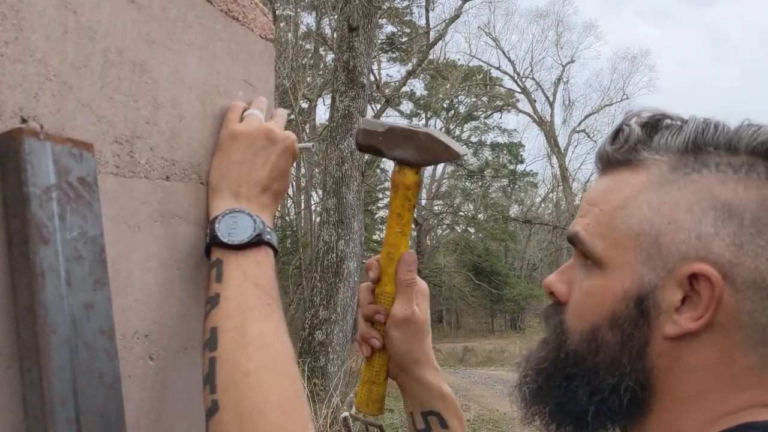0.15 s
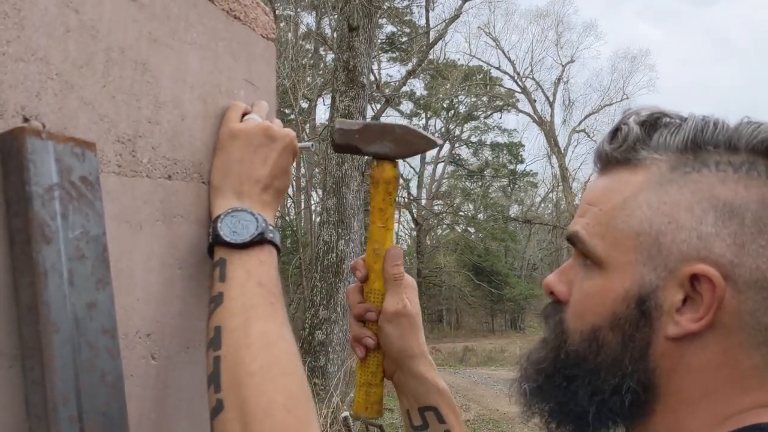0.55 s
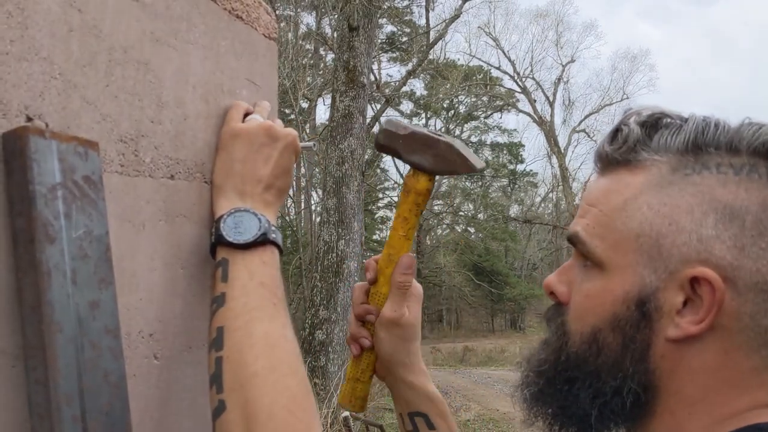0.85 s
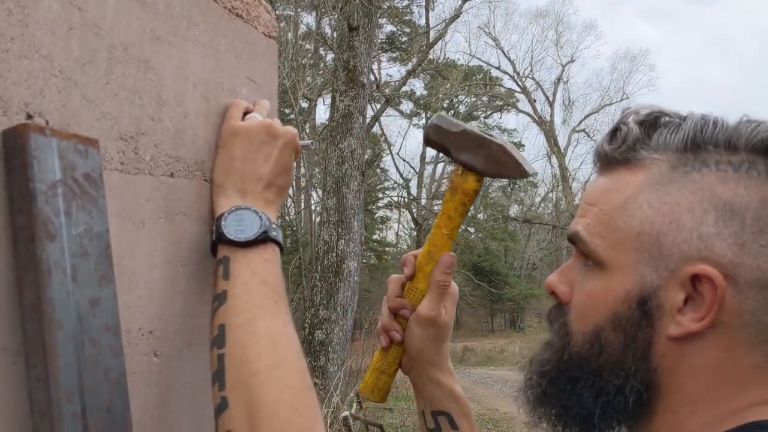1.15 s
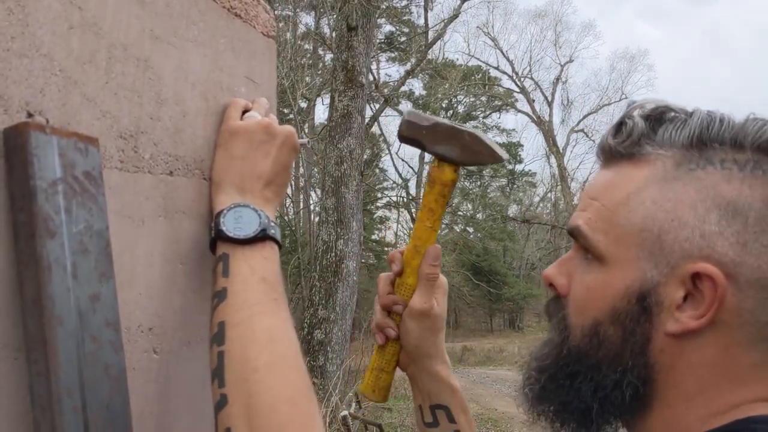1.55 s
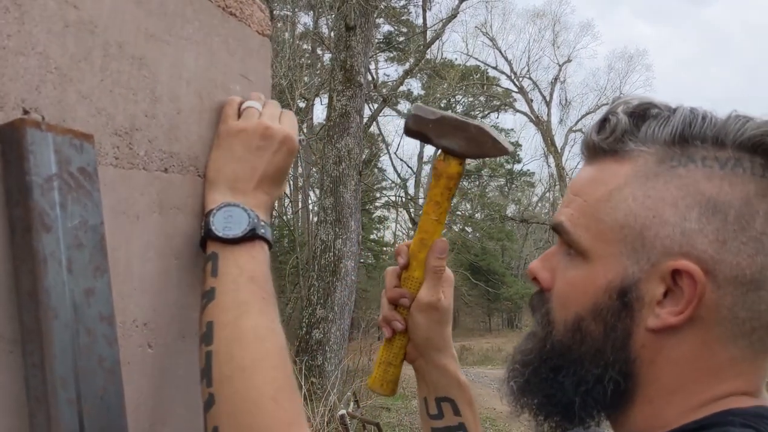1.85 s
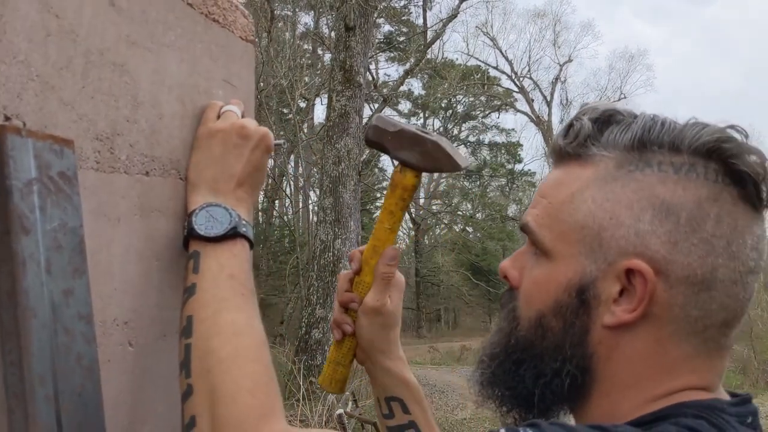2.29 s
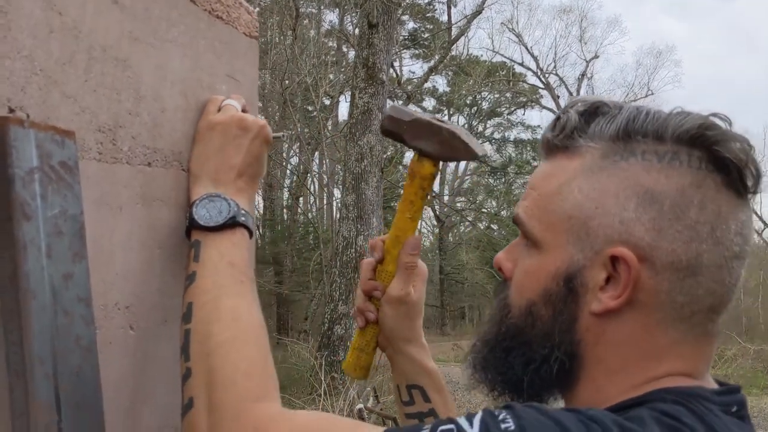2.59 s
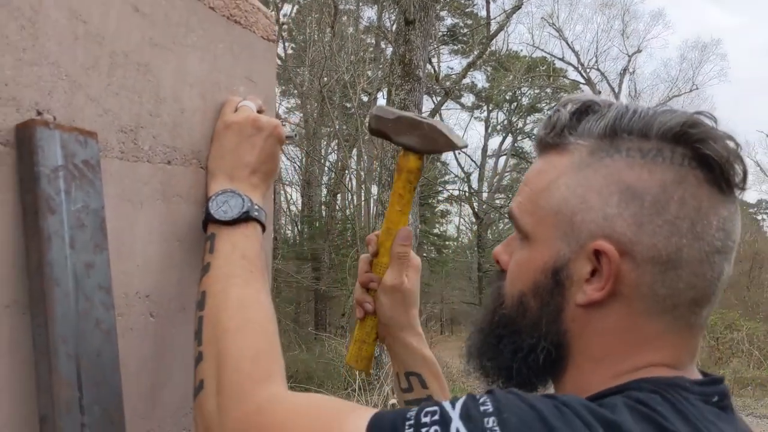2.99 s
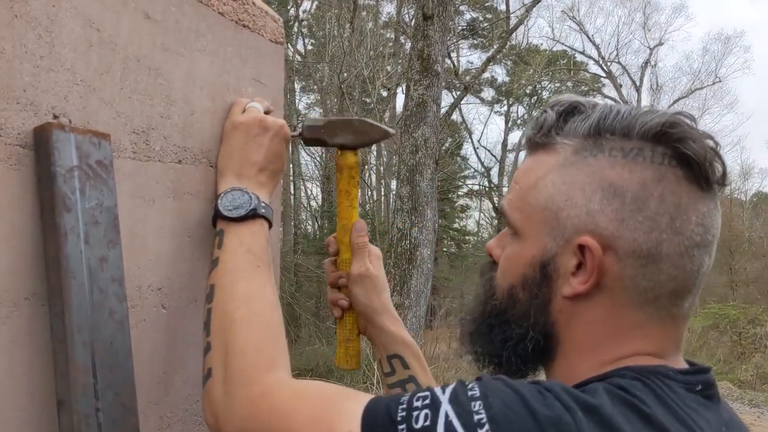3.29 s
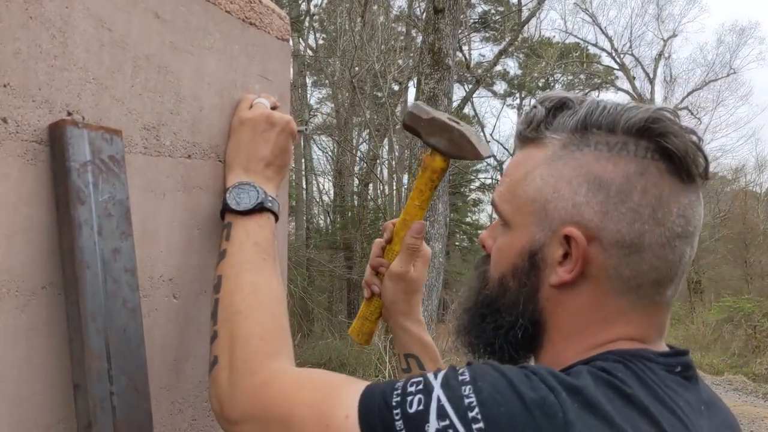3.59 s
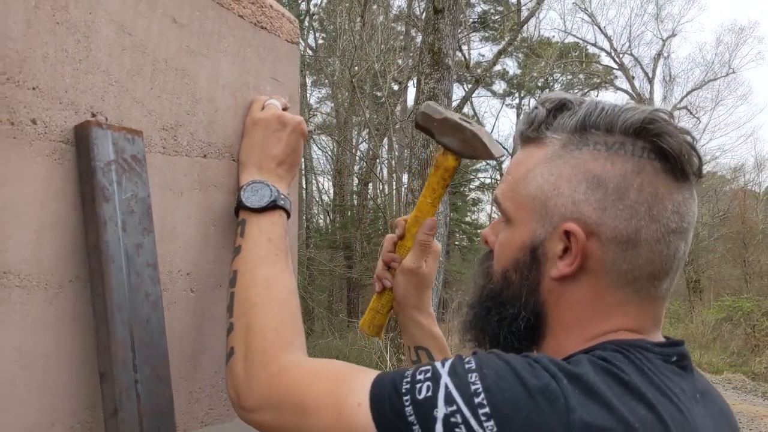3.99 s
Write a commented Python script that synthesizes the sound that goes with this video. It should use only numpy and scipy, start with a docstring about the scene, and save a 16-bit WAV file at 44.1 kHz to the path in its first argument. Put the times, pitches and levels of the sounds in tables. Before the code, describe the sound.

Over quiet outdoor rumble, steel strikes steel about twice a second, dry and piercing, with a damped earthy thud and a soft wash back from the trees. After four hits, skin rubs grit faintly and the loose sleeve ticks twice. Four more hits follow, knocking louder as the anchor seats, while distant birds whistle and chirp. Stereo, close microphone, peaks flattened by overload.

```python
"""Outdoors, over a low rumble of noise, a hammer drives a steel anchor and sleeve into an earth wall: four blows.
Each is a burst of noise (the crack), a sinking low note (the thud), ringing sines, echoes and a wash from trees.
In the pause, fingers brush the wall in swells of noise and the sleeve clinks twice, in short sines and noise.
Far birds, made of gliding sines over a blur of noise, grow clearer and four more blows follow; one bird repeats a
phrase through the last three while others call, and the fingers brush once more. The cracks overload the input."""
import sys
import numpy as np
from scipy import signal
from scipy.fft import rfft, irfft, next_fast_len
from scipy.io import wavfile
from scipy.ndimage import uniform_filter1d

SR = 44100
rng = np.random.default_rng(int(sys.argv[2]) if len(sys.argv) > 2 else 0)


def dump_mix(stems):
    """Bounce the given channels to the path in sys.argv[1] as a 16-bit WAV at rate SR."""
    frames = np.atleast_2d(stems).T  # one column per channel
    limited = np.clip(frames, -1, 1)  # hard clip at full scale
    pcm = np.round(limited * 32767).astype(np.int16)
    wavfile.write(sys.argv[1], SR, pcm)


N = 182733
TIME = np.arange(N) / SR  # seconds

# All dB are relative levels; a "fall time" is the time to fade by 60 dB.
# colour of the outdoor rumble: (frequency [Hz], level per Hz [dB])
AIR_COLOUR = [(18, -73.5), (30, -38), (66, -12.5), (153, -3), (245, -14), (273, -10), (303, -17),
              (801, -23), (1010, -26.5), (1350, -23), (1910, -29), (2350, -30), (2830, -36), (12000, -44.5),
              (16000, -56)]
# loudness of the blur of many far birds: (time [s], level [dB])
CHORUS_LEVEL = [(0, -98), (2.6, -87), (3.0, -65), (3.25, -71.5), (3.5, -63.5), (4.14, -66)]
# colour of that blur: (frequency [Hz], level per Hz [dB])
CHORUS_COLOUR = [(1200, -22.5), (2200, 1), (2800, 4.5), (4200, -10), (6500, -22), (12000, -34)]
# hammer blows: (time [s], thud [dB], steel ring [dB], wash from the trees [dB], strongest clang [Hz])
BLOWS = [(0.1103, -20, -5.5, -8.5, 7600), (0.5647, -5.5, -7.5, -6, 11240), (1.0069, -3.5, 2, -3, 12530),
         (1.444, -5, 3.5, -2, 12270), (2.4589, -8.5, 1, -4, 6220), (2.9223, -8.5, -5.5, 6, 8500),
         (3.3728, -1, -1.5, 4.5, 3120), (3.828, 0.3, -5.5, 1.5, 6300)]
# colour of the steel crack: (frequency [Hz], level per Hz [dB])
CRACK_COLOUR = [(100, -41.5), (400, -16), (1300, -4), (1700, -3.5), (2200, -4.5), (3000, 5.5), (4200, 2.5),
                (5900, 0), (6900, -2), (8600, 2), (9700, 3), (12500, 3.5), (14300, -4), (15600, 3)]
# the wall around the hole: (frequency [Hz], level [dB], fall time [s])
WALL_TONES = [(563, -31.5, 0.027), (680.3, -24.5, 0.025)]
# the anchor knocking in its hole: (frequency [Hz], level [dB], fall time [s])
KNOCK_TONES = [(945, -26, 0.017), (1156, -21.5, 0.018), (1345, -21.5, 0.011), (1530, -50.5, 0.12)]
# the hammer head and handle shuddering: (frequency [Hz], level [dB], fall time [s])
SHUDDER_TONES = [(198, -31.5, .099), (302.6, -30, .092), (434, -36, 0.054)]
# short overtones of the steel: (frequency [Hz], level [dB], fall time [s])
STEEL_OVERTONES = [(2740, -42, 0.055), (3220, -39.5, .06), (3800, -39.5, 0.039), (6100, -34.5, 0.055),
                   (6400, -36, .06), (8200, -41.5, 0.085), (11900, -32, 0.066), (13000, -30, 0.055),
                   (14800, -44.5, .06), (15570, -40, .06)]
# reflections from the ground and a far wall: (delay [s], level [dB])
ECHOES = [(.0080, -23), (.0390, -30), (0.0433, -33.5)]
# colour of the crack scattered nearby: (frequency [Hz], level per Hz [dB])
SCATTER_COLOUR = [(80, -30.5), (300, 0.5), (1400, -2), (2100, -6), (3200, -2), (4700, -0.5), (6300, 0),
                  (7600, -5), (11700, -1.5), (15000, -6)]
# colour of the wash from the trees: (frequency [Hz], level per Hz [dB])
WASH_COLOUR = [(300, -11.5), (1200, -12), (3000, 0.5), (7000, 0), (11000, 1.5), (16000, -9.5)]
# the two microphone ports colour close sound differently: (frequency [Hz], left minus right [dB])
PORT_BALANCE = [(400, 0), (1200, -1.5), (2400, 0), (3500, 7), (4700, 3.5), (6400, -7), (8500, 3),
                (10700, -7), (12100, 2), (13500, -4), (15300, 3)]
# fingers brushing the wall: (time [s], length [s], level [dB])
RUBS = [(1.869, .15, -67.5), (2.063, .13, -74), (2.244, .09, -66), (4.015, .1, -58.5)]
# colour of the brushing: (frequency [Hz], level per Hz [dB])
RUB_COLOUR = [(2000, 0), (7000, -6), (11500, 2), (16000, -10)]
# light touches of steel on the sleeve: (time [s], level [dB], frequency [Hz], fall time [s])
CLINKS = [(2.0018, -45.5, 7930, 0.074), (2.0477, -44, 5170, 0.011)]
# sleeve overtones that every touch wakes: (frequency [Hz], level [dB], fall time [s])
SLEEVE_OVERTONES = [(6480, -18, 0.076), (8150, 2, 0.02), (10600, -17, .035), (11700, -20, .035)]
# other birds with single slurs, before and during the song:
# (time [s], length [s], start [Hz], end [Hz], level [dB])
SLURS = [(2.37, 0.1, 1770, 1830, -71), (2.684, 0.049, 2500, 1755, -72.5), (3.262, 0.14, 6400, 4800, -79),
         (3.55, 0.043, 1693, 1990, -59), (3.663, 0.18, 2817, 2214, -57), (3.748, .034, 3390, 4530, -64),
         (3.888, 0.084, 2930, 2975, -62)]
# notes of the repeated song: (time into the phrase [s], length [s], start [Hz], end [Hz], level [dB])
PHRASE = [(-.004, .05, 1930, 2124, -61.5), (0.049, .09, 2054, 2100, -69), (0.118, .08, 2626, 3056, -56)]

AIR_DB = -63.5
PORT_LAG_S = .00016
# each blow drives the anchor a share of the way left; seated deeper, it knocks and barks louder
SINK_PER_BLOW = .24
# level at the first blow, and the rise for an anchor driven all the way in
KNOCK_DB, KNOCK_SEATED_DB = -3.5, 11
BARK_HZ, BARK_DB, BARK_SEATED_DB = 3000, -4, 7
# where the hammer face lands favours one broad resonance of anchor and sleeve
CLANG_DB, CLANG_WIDTH_HZ = 6, 900
THUD_DB, RING_DB = -18, -2.5
SHUDDER_FOLLOWS_THUD = 0.44  # dB per dB of thud
SCATTER_FOLLOWS_RING = .25  # dB per dB of ring: a blow that rings well leaves more clatter
STEEL_HZ = 11962
# stray chirps at random over the chorus
CHIRPS_PER_S, CHIRP_S, CHIRP_HZ, CHIRP_OVER_CHORUS_DB = 7.5, .05, 2800, -2.5
CHIRP_SPREAD_OCT, CHIRP_GLIDE_OCT = 0.19, 0.11
# one bird repeats its phrase at an even pace, starting softly
SONG_START_S, SONG_PERIOD_S, SONG_SOFT_START_DB = 2.808, .371, -4.5
BIRD_WAVER = .018  # share of the pitch, rms
WOOD_T60_S, WOOD_DB = .4, 3.5
CUTOFF_HZ = 17150


def from_db(db):
    """Turn decibels into a plain multiplier."""
    return 10 ** (np.asarray(db) / 20)


def rms_one(x):
    """Scale a signal to an average strength (rms) of 1."""
    return x / np.sqrt(np.mean(x ** 2) + 1e-20)


def at_hz(points, hz):
    """Read a curve of (Hz, dB) points at any frequency, on a logarithmic pitch scale."""
    points = np.array(points)
    return np.interp(np.log(hz), np.log(points[:, 0]), points[:, 1])


def add(track, s, sound):
    """Lay a sound into a track at time s, cutting off what runs past the end."""
    start = round(s * SR)
    track[:, start:start + sound.shape[-1]] += sound[..., :N - start]


def filtered(x, order, hz, kind="low"):
    """Pass a sound through a smooth low-cut ("high") or high-cut ("low") filter."""
    return signal.sosfilt(signal.butter(order, hz, kind, fs=SR, output="sos"), x)


def delayed(x, s):
    """Shift a sound later, even by a fraction of a sample."""
    index = np.arange(len(x))
    return np.interp(index - s * SR, index, x, left=0)


def two_ports(x, lag_s, pan_db):
    """Sound from the left reaches the right port a little later; pan_db is left minus right."""
    left = x * from_db(pan_db / 2)
    right = delayed(x, lag_s) * from_db(-pan_db / 2)
    return np.array([left, right])


def noise(colour, size):
    """Two unrelated channels of coloured noise; rms 1."""
    hz = np.fft.rfftfreq(size, 1 / SR) + 1
    spectrum = rfft(rng.standard_normal((2, size)))
    return rms_one(irfft(spectrum * from_db(at_hz(colour, hz)), size))


def ring(modes, t, alternate=False):
    """Struck things sound as fading sines; every strike shares its force out a little differently."""
    sign = -1 if alternate else 1  # alternate: every second sine starts downward
    total = np.zeros(len(t))
    for k, (hz, db, t60) in enumerate(modes):
        fading = from_db(db + rng.standard_normal() - 60 * t / t60)
        total += sign ** k * fading * np.sin(2 * np.pi * hz * t)
    return total


def grainy(size, depth_db):
    """Separate reflections make a tail uneven from one millisecond to the next; rms 1."""
    bumps = rms_one(uniform_filter1d(rng.standard_normal(size), size=60))
    return rms_one(from_db(depth_db * bumps))


def air():
    """Outdoor rumble that swells a little, more alike at both ports in the bass."""
    mid, side = filtered(noise(AIR_COLOUR, N), 4, 13000)
    side = side - 0.37 * filtered(side, 1, 900)
    drift = uniform_filter1d(rng.standard_normal(N), size=5000)
    swell = rms_one(uniform_filter1d(drift, size=3000, mode="wrap"))
    return from_db(AIR_DB + 0.38 * swell) * np.array([mid + side, mid - side])


def chorus():
    """Many far birds blur into coloured noise whose level follows a curve."""
    level_db = np.interp(TIME, *np.transpose(CHORUS_LEVEL))
    return from_db(level_db) * noise(CHORUS_COLOUR, N)


def hammer():
    """Each blow sends crack, knock, thud, shudder and ring directly, then echoes, scatter and wash."""
    direct, around, t = np.zeros((2, N)), np.zeros((2, N)), TIME[:SR // 2]
    for k, (s, thud_db, ring_db, wash_db, clang_hz) in enumerate(BLOWS):
        seated = 1 - (1 - SINK_PER_BLOW) ** k  # 0 at the first blow, 1 when fully in
        colour = clang_colour(clang_hz, seated)
        hit = two_ports(knock(t, seated), lag_s=0.000084, pan_db=0)
        add(hit, 0, strike(colour, near_db=9.3, apart_db=2.5))
        add(direct, s, hit)
        add(direct, s, from_db(THUD_DB + thud_db) * two_ports(thud(t), lag_s=0.00025, pan_db=5.5))
        shudder = two_ports(ring(SHUDDER_TONES, t, alternate=True), lag_s=0.00022, pan_db=4)
        add(direct, s, from_db(SHUDDER_FOLLOWS_THUD * thud_db) * shudder)
        # the head's main tone outlasts all the others
        steel = ring([(STEEL_HZ, -30, .19)] + list(STEEL_OVERTONES), t)
        add(direct, s, from_db(RING_DB + ring_db) * two_ports(steel, PORT_LAG_S, pan_db=-4.5))
        for delay_s, echo_db in ECHOES:
            add(around, s + delay_s, from_db(echo_db) * hit)
        add(around, s, from_db(SCATTER_FOLLOWS_RING * ring_db) * scatter(t, colour))
        add(around, s, from_db(wash_db) * wash(t))
    return port_colour(direct) + around


def clang_colour(clang_hz, seated):
    """A spectrum with broad bumps at the favoured resonance and at the sleeve's bark: (Hz, dB)."""
    hz = np.geomspace(80, 17000, num=120)
    clang = np.exp(-((hz - clang_hz) / CLANG_WIDTH_HZ) ** 2)
    bark = np.exp(-((hz - BARK_HZ) / CLANG_WIDTH_HZ) ** 2)
    bark_db = BARK_DB + BARK_SEATED_DB * seated
    return np.column_stack([hz, CLANG_DB * clang + bark_db * bark])


def knock(t, seated):
    """The wall around the hole rings briefly, and the anchor in it louder as it sits deeper."""
    wall = ring(WALL_TONES, t, alternate=True)
    anchor = ring(KNOCK_TONES, t, alternate=True)
    return wall + from_db(KNOCK_DB + KNOCK_SEATED_DB * seated) * anchor


def crack(colour, contact_s, t60, size=512):
    """Steel chatters on steel for about a millisecond: a burst with an even, coloured spectrum."""
    t, hz = TIME[:size], np.fft.rfftfreq(size, 1 / SR) + 1
    shape = from_db(-60 * np.maximum(t - contact_s, 0) / t60)
    gain = from_db(at_hz(CRACK_COLOUR, hz) + at_hz(colour, hz))
    spectrum = rfft(rng.standard_normal(size) * shape)
    # dividing by the local strength evens out chance peaks and gaps
    local = np.sqrt(uniform_filter1d(np.abs(spectrum) ** 2, size=25))
    fade_out = np.minimum(1, (t[-1] - t) / t[size // 2]) ** 2
    return irfft(spectrum / local * gain, size) * fade_out


def strike(colour, near_db, apart_db):
    """The crack as both ports hear it: partly alike, partly by paths of their own."""
    near = two_ports(crack(colour, contact_s=.0006, t60=.0032), PORT_LAG_S, pan_db=0)
    apart = np.array([crack(colour, contact_s=.0008, t60=.008) for side in range(2)])
    return from_db(near_db) * near + from_db(apart_db) * apart


def thud(t, start_hz=216, end_hz=134, slacken_s=.012):
    """The wall's low note sinks as the pressure of the blow lets go, sways back once and is soon damped."""
    hz = end_hz + (start_hz - end_hz) * np.exp(-(t / slacken_s) ** 4)
    push = (1 - np.exp(-(t / 0.00675) ** 2)) * from_db(-60 * t / .11)
    sway = from_db(-18.5) * np.exp(-((t - .032) / 0.0043) ** 2)
    wave = -(push + sway) * np.cos(2 * np.pi * np.cumsum(hz) / SR)
    return filtered(wave, 1, 95, "high")


def scatter(t, colour):
    """Wall, frame and body scatter the crack: a quick fall, then a slower one."""
    rise = 1 - np.exp(-t / .0012)
    fall = from_db(-21 - 60 * t / 0.043) + from_db(-35.5 - 60 * t / .16)
    # the tail keeps part of the blow's own colour
    tint = [(hz, at_hz(SCATTER_COLOUR, hz) + .4 * db) for hz, db in colour]
    shared = two_ports(noise(tint, len(t))[0], lag_s=.0001, pan_db=4.5)
    separate = noise(tint, len(t))
    return rise * fall * grainy(len(t), depth_db=1.7) * 0.76 * (shared + separate)


def wash(t, trees_s=0.13):
    """Trunks and leaves send back a soft tail, with a swell when the edge of the wood answers."""
    tail = from_db(-48.5 - 60 * t / 0.42) * (1 - np.exp(-(t / 0.015) ** 2))
    edge = from_db(-68.5) * np.exp(-((t - trees_s) / 0.037) ** 2)
    return np.hypot(tail, edge) * grainy(len(t), depth_db=1.5) * noise(WASH_COLOUR, len(t))


def port_colour(x):
    """Each port lifts the bands that the other one loses."""
    size = next_fast_len(N)
    balance_db = at_hz(PORT_BALANCE, np.fft.rfftfreq(size, 1 / SR) + 1)
    gain = from_db(np.array([balance_db, -balance_db]) / 2)
    gain = gain / np.sqrt(np.mean(gain ** 2, axis=0))  # keep the two ports' average power
    return irfft(rfft(x, size) * gain, size)[:, :N]


def rubs():
    """Skin on grit makes soft, bright swells of noise."""
    out = np.zeros((2, N))
    for s, length_s, db in RUBS:
        size = round(length_s * SR)
        swell = np.sin(np.linspace(0, np.pi, size)) ** 2
        add(out, s, from_db(db) * swell * noise(RUB_COLOUR, size))
    return out


def clinks():
    """The loose sleeve ticks twice in the pause: fading tones with a little noise."""
    out, t = np.zeros((2, N)), TIME[:SR // 5]
    for s, db, hz, t60 in CLINKS:
        tone = ring([(hz, 0, t60)] + list(SLEEVE_OVERTONES), t)
        fall = from_db(-9.5 - 60 * t / 0.016) + from_db(-19 - 60 * t / 0.23)
        tick = fall * noise([(2000, -3), (5000, -4), (11000, 2.5), (16000, -21.5)], len(t))
        add(out, s, from_db(db) * (two_ports(tone, PORT_LAG_S, pan_db=-4) + tick))
    return out


def birds():
    """Far whistles, smeared by the wood: each is mixed with a fading tail of random echoes."""
    dry_notes, t = np.zeros((2, N)), TIME[:SR // 2]
    for s, *note in chirps() + list(SLURS) + song():
        add(dry_notes, s, whistle(*note))
    wood = rng.standard_normal((2, len(t))) * from_db(-60 * t / WOOD_T60_S)
    wood = wood / np.sqrt(np.sum(wood[0] ** 2))
    smeared = signal.fftconvolve(dry_notes, wood, axes=1)[:, :N]
    return dry_notes + from_db(WOOD_DB) * smeared


def whistle(length_s, start_hz, end_hz, db):
    """One gliding, wavering note that swells and fades."""
    u = np.linspace(0, 1, round(length_s * SR))  # 0 to 1 along the note
    wander = rms_one(uniform_filter1d(rng.standard_normal(SR // 2), size=200))[:len(u)]
    hz = (start_hz + (end_hz - start_hz) * u) * (1 + BIRD_WAVER * wander)
    phase = 2 * np.pi * np.cumsum(hz) / SR
    return from_db(db) * np.sin(np.pi * u) * np.sin(phase)


def chirps(count=16):
    """Short notes at loose intervals and chance pitches, following the chorus level: rows like SLURS."""
    before_end_s = (np.arange(count) + rng.uniform(0.55, 1, count)) / CHIRPS_PER_S
    s = TIME[-1] - before_end_s
    pitch, glide = rng.standard_normal((count, 2)).T
    start_hz = CHIRP_HZ * 2 ** (CHIRP_SPREAD_OCT * pitch)
    end_hz = start_hz * 2 ** (CHIRP_GLIDE_OCT * glide)
    db = np.interp(s, *np.transpose(CHORUS_LEVEL)) + CHIRP_OVER_CHORUS_DB
    rows = zip(s, np.full(count, CHIRP_S), start_hz, end_hz, db)
    return [row for row in rows if row[0] > 0]


def song(count=4):
    """One bird repeats its phrase, the first time softly: rows like SLURS."""
    rows = []
    for k in range(count):
        phrase_s = SONG_START_S + k * SONG_PERIOD_S
        phrase_db = SONG_SOFT_START_DB if k == 0 else 0
        for offset_s, length_s, start_hz, end_hz, db in PHRASE:
            rows.append((phrase_s + offset_s, length_s, start_hz, end_hz, db + phrase_db))
    return rows


def scene():
    """All sounds together, with the hammer's deepest bass cut."""
    close = filtered(hammer(), 2, 58, "high")
    return air() + chorus() + close + rubs() + clinks() + birds()


def record(dry):
    """The cracks overload the input, which flattens their peaks; the deepest bass and the top are cut."""
    top = .76  # the largest level the input can reach
    clipped = dry / (1 + (dry / top) ** 4) ** .25
    clipped = filtered(clipped, 2, 32, "high")
    return signal.sosfilt(signal.cheby2(14, 70, CUTOFF_HZ, fs=SR, output="sos"), clipped)


dry = scene()
out = record(dry)
dump_mix(out)
```